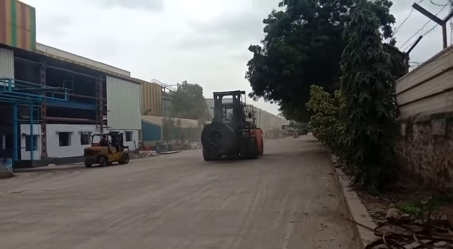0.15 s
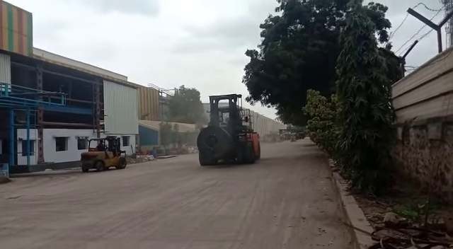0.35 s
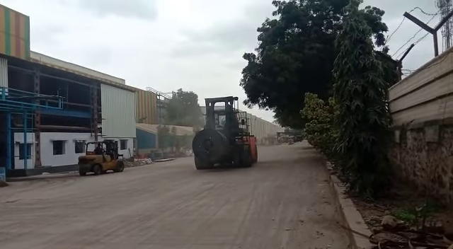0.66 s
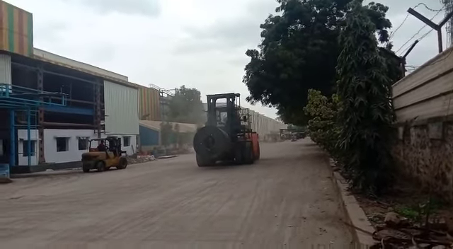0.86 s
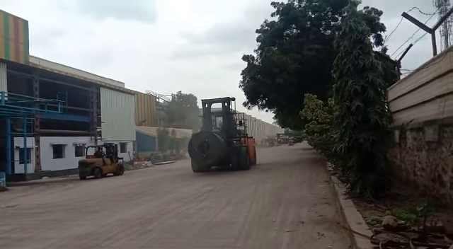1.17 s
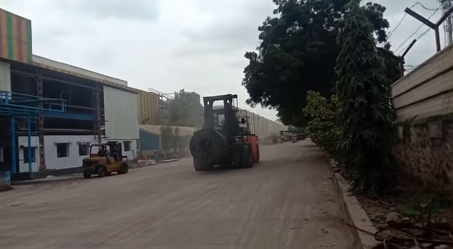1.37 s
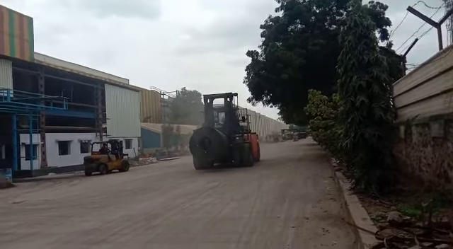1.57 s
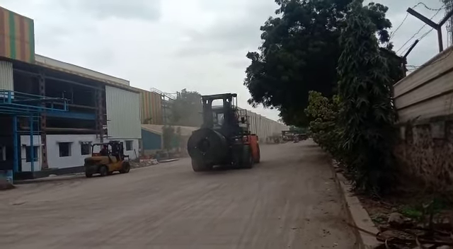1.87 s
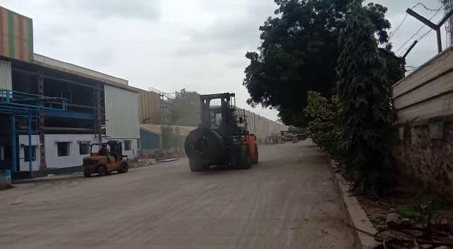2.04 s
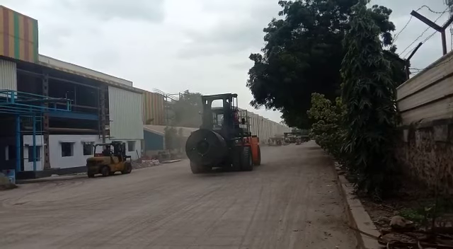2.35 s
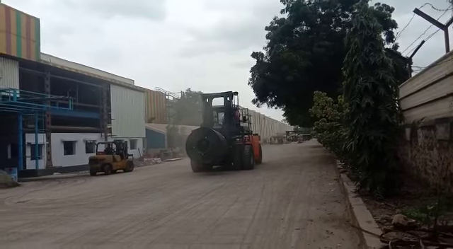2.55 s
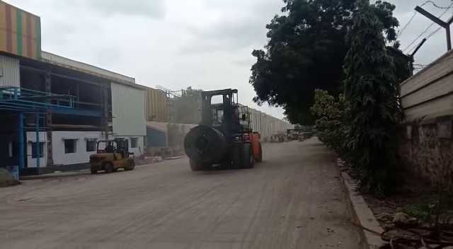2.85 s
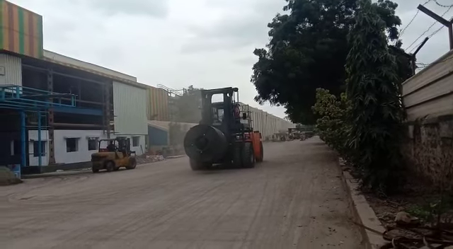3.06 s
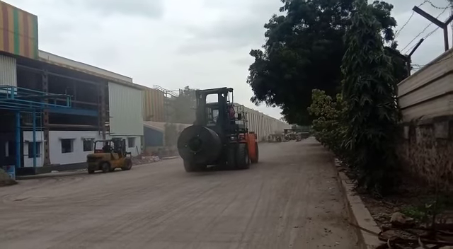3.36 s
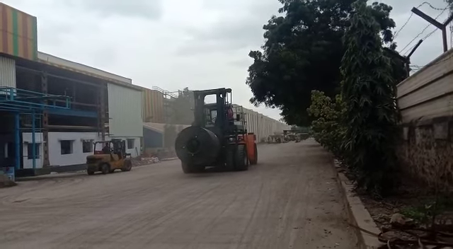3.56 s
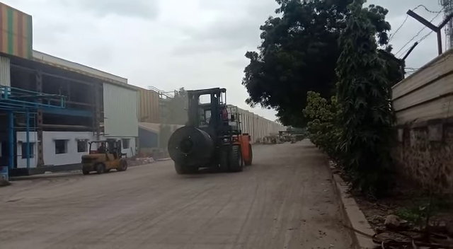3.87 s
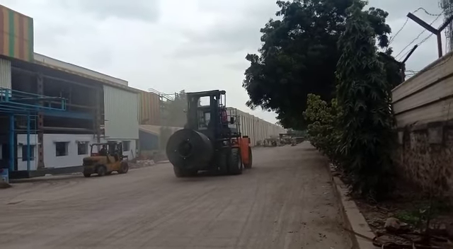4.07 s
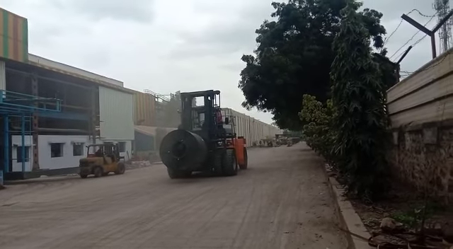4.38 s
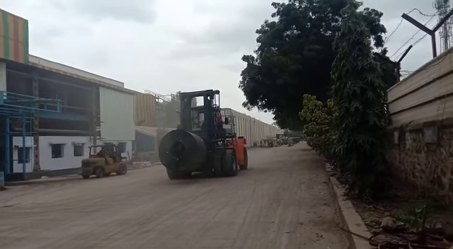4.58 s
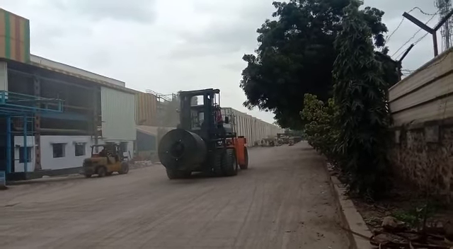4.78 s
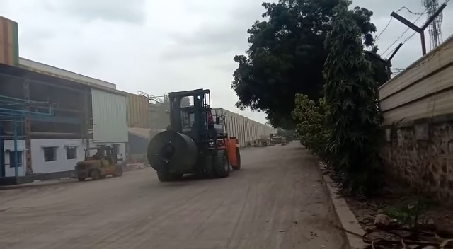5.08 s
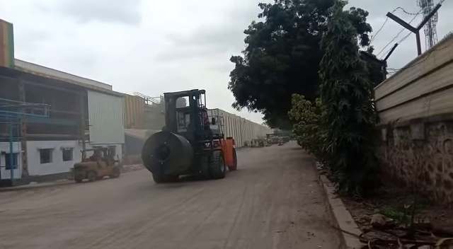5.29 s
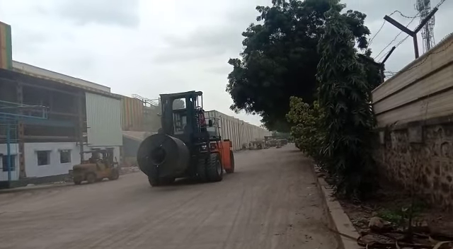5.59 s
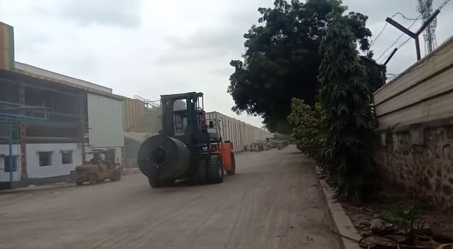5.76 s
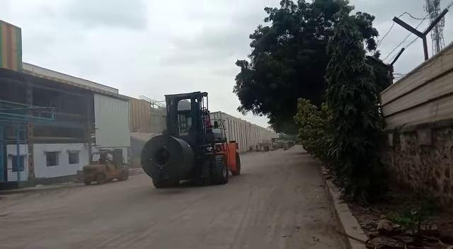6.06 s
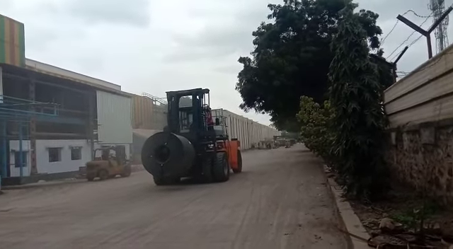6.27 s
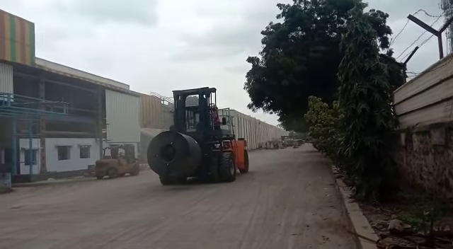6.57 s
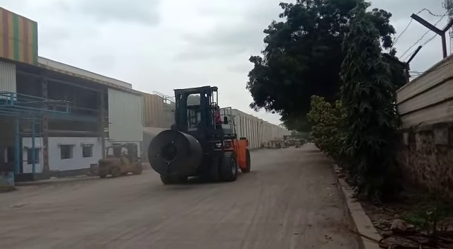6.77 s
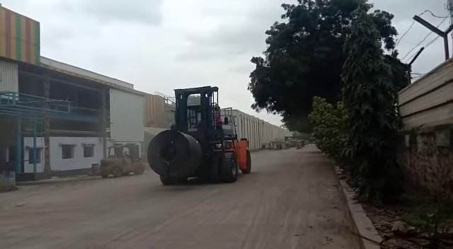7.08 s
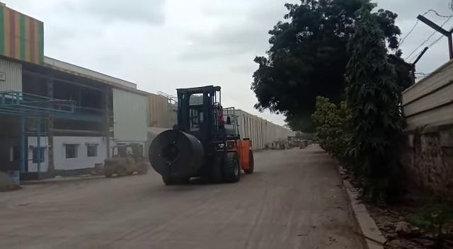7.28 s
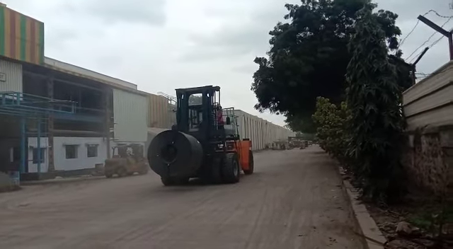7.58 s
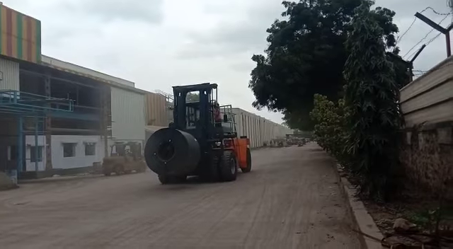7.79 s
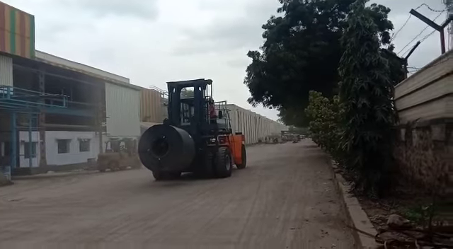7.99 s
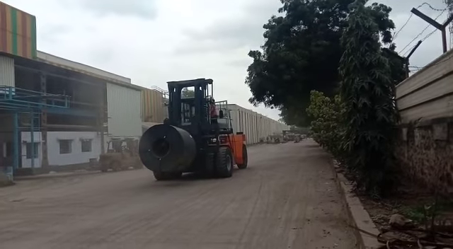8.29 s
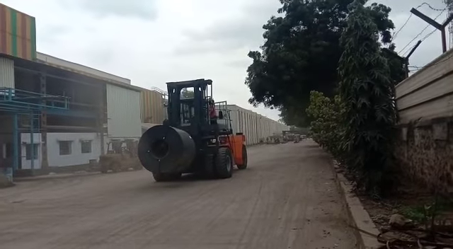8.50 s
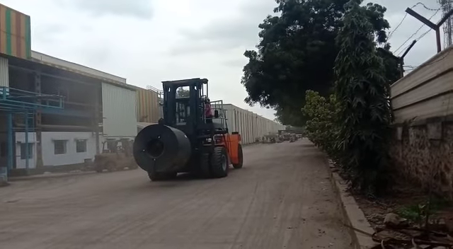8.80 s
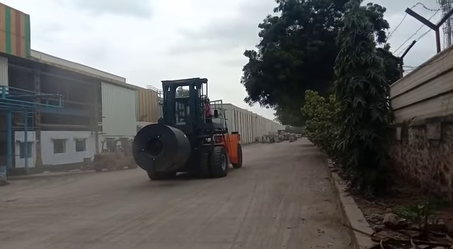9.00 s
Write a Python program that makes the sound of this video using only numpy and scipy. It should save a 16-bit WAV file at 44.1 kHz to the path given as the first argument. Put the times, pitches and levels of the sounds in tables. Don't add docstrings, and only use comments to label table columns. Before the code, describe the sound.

Outdoors in a dusty industrial yard, a heavy forklift carrying a large coil approaches. Its deep, smooth exhaust boom holds, rises slightly around two and a half seconds, then falls away into faint uneven coasting near five. A steady engine drone, broad airy roar and thin fan whine continue throughout. Mono microphone at a distance, dull on top.

```python
import sys
import numpy as np
from scipy import signal
from scipy.fft import rfft, irfft, next_fast_len
from scipy.io import wavfile
from scipy.ndimage import uniform_filter1d

SR = 44100
rng = np.random.default_rng(int(sys.argv[2]) if len(sys.argv) > 2 else 0)


def convert_level_to_amplitude(level_db):
    exponent = np.asarray(level_db, float) / 20
    return 10 ** exponent


def generate_wav(signal):
    frames = np.transpose(np.atleast_2d(signal))
    scaled = np.clip(frames, -1, 1) * 32767
    pcm = np.round(scaled).astype(np.int16)
    wavfile.write(sys.argv[1], SR, pcm)


N = 403074

# time_s, firing_hz, boom_db
FORKLIFT_EXHAUST = [(0.0, 98.6, -28), (0.15, 97, -17.5), (0.3, 92.6, -20.5), (1.5, 92.6, -17.5),
                    (2.26, 92, -19.5), (2.42, 100.6, -24.5), (2.52, 100.6, -19), (3.92, 100.5, -24.5),
                    (4.45, 100.1, -19.5), (4.97, 87.7, -31), (5.3, 80.1, -39), (6.1, 81.4, -33),
                    (6.45, 83, -38), (6.8, 85, -36), (7.3, 88, -33), (8.0, 82.4, -41), (8.3, 80, -34),
                    (9.14, 83, -35)]
# time_s, firing_order, level_db
THROTTLE_BARKS = [(4.85, 2, -28)]
# time_s, distance_m
FORKLIFT_DISTANCE = [(0, 28.6), (1.6, 32), (3.2, 24.5), (5, 21), (7.5, 22), (9.14, 20.7)]
# start_s, end_s, pitch_hz,
# level_db
SIDE_TONES = [(-.2, .3, 277, -33), (2.4, 3.2, 283, -37), (2.5, 3.5, 291, -40), (5.95, 9.14, 156, -38),
              (5.3, 8.9, 107, -40), (0, 9.14, 1626, -45), (0, 9.14, 1404, -44), (0, 9.14, 1256, -42),
              (3.4, 4.4, 272, -40), (0, 5, 212, -41), (0, 9.14, 590, -48), (0, 9.14, 318, -45)]
# time_s, peak_db
CHAIN_TICKS = [(0.9509, -45), (3.0436, -42), (5.7405, -44), (6.854, -44), (8.7347, -44), (9.0315, -45)]
# cycle_multiple, level_db
PLANT_ORDERS = [(11, -41.7), (14, -42.4), (16, -34.4), (18, -43.5), (22, -37.0), (28, -44.7), (31, -52.3),
                (32, -42.7), (36, -45.0), (40, -49.4), (41, -49.7), (48, -51.2), (56, -53.0), (62, -43.1),
                (66, -47.3), (68, -57.0), (74, -52.8), (76, -54.4), (78, -45.6), (79, -52.1), (85, -44.9),
                (86, -44.1), (93, -56.7), (128, -45.6), (138, -46.3), (145, -42.6), (149, -48.4),
                (150, -49.2), (227, -52.6), (246, -52.5)]
# start_s, end_s, cycle_rate_loss_hz
GOVERNOR_DROOPS = [(2.4, 4.0, .007), (7.0, 9.14, .0095)]
# time_s, half_length_s, dip_db
YARD_SHADES = [(3.4, .5, -11), (8.601, 0.8, -9)]
# frequency_hz, density_db_per_hz
RUMBLE_SPECTRUM = [(20, -36), (34, -36), (42, -12.5), (57, -24), (80, -2.5), (125, -3), (200, -2.5),
                   (230, -6), (250, -4), (320, -11), (355, -12), (520, -14.5), (1000, -18.5), (2200, -58)]
# frequency_hz, density_db_per_hz
BLAST_SPECTRUM = [(410, -20.5), (700, -15), (888, -9.5), (1010, -11), (1260, 0), (1830, -8.5), (2240, -6),
                  (2510, -6.5), (2950, -8.5), (3930, -17.5), (4800, -20), (6240, -22), (7250, -27.5),
                  (8970, -38.5), (13900, -53)]
# centre_hz, width_hz, gain_db
DUCT_RESONANCES = [(1220, 52, 4), (2140, 640, 1), (6130, 860, 5), (7200, 930, 8), (13700, 1400, -4)]
ROAR_CENTRES_HZ = [250, 1800, 5500, 12000]
NEAR_SHARES = [.05, .3, .5, .65]
# frequency_hz, density_db_per_hz
SHROUD_SPECTRUM = [(600, -120), (1100, -18), (1290, -3), (1370, 0.5), (1450, -6.5), (1560, -23),
                   (2000, -33), (4000, -120)]
# frequency_hz, density_db_per_hz
PORT_SPECTRUM = [(12000, -40), (13900, -16), (14300, -6), (14900, 0), (15600, -1)]

TIME_S = np.arange(N) / SR
PLANT_CYCLE_HZ = 10.6342
FAN_NEAR_SHARE = 0.93


def in_time(rows):
    time_s, *columns = np.transpose(rows)
    return [np.interp(TIME_S, time_s, column) for column in columns]


def rms_one(x):
    return x / np.sqrt(np.mean(x ** 2) + 1e-20)


def drift(rate_hz):
    hop, settle = 40, 2000
    pole = np.exp(-2 * np.pi * hop * rate_hz / SR)
    noise = rng.standard_normal(N // hop + settle + 2)
    slow = signal.lfilter([1], [1, -2 * pole, pole * pole], noise)[settle:]
    return np.interp(np.arange(N) / hop, np.arange(len(slow)), rms_one(slow))


def colour(x, spectrum, peaks=()):
    hz = np.maximum(np.arange(N // 2 + 1) * SR / N, 1)
    points = np.array(spectrum)
    shape_db = np.interp(np.log(hz), np.log(points[:, 0]), points[:, 1])
    for centre_hz, width_hz, bump_db in peaks:
        shape_db = shape_db + bump_db / (1 + (2 * (hz - centre_hz) / width_hz) ** 2)
    return rms_one(irfft(rfft(x) * convert_level_to_amplitude(shape_db), N))


def load(lag_s=0):
    lift_off_s, unload_s = 4.9, 0.36
    return np.clip((lift_off_s + lag_s - TIME_S) / unload_s + .5, 0, 1)


def near_db():
    metres, = in_time(FORKLIFT_DISTANCE)
    return 20 * np.log10(metres[0] / metres)


def forklift(uneven_db):
    coast_wander_hz, coast_uneven_db = 2.0, 2.0
    overtones_db, bark_s = [0, -26, -27], 0.19
    coasting = 1 - load()
    firing_hz, boom_db = in_time(FORKLIFT_EXHAUST)
    phase = 2 * np.pi * np.cumsum(firing_hz + coast_wander_hz * coasting * drift(8)) / SR
    spread_db = uneven_db + coast_uneven_db * coasting
    out = 0
    for k, order_db in enumerate(overtones_db):
        level_db = boom_db + order_db + spread_db * drift(6.2)
        out = out + convert_level_to_amplitude(level_db) * np.sin((k + 1) * phase + k)
    for bark_at_s, order, bark_db in THROTTLE_BARKS:
        swell = np.exp(-((TIME_S - bark_at_s) / bark_s) ** 2)
        out = out + convert_level_to_amplitude(bark_db) * swell * np.sin(round(order) * phase)
    return np.sqrt(2) * out


def side_tones():
    swell_s, waver_hz, sway_db = 0.14, 2.2, 3
    out = 0
    for start_s, end_s, pitch_hz, level_db in SIDE_TONES:
        swell = np.clip(np.minimum(TIME_S - start_s, end_s - TIME_S) / swell_s, 0, 1)
        phase = 2 * np.pi * np.cumsum(pitch_hz + waver_hz * drift(4)) / SR
        out = out + np.sqrt(2) * convert_level_to_amplitude(level_db + sway_db * drift(3)) * swell * np.sin(phase)
    return out


def plant_turns():
    turns = PLANT_CYCLE_HZ * TIME_S
    for start_s, end_s, loss_hz in GOVERNOR_DROOPS:
        turns = turns - loss_hz * np.clip(TIME_S - start_s, 0, end_s - start_s)
    return turns


def hum_db():
    level_db, depth, period_s, first_peak_s = -34.5, .55, 2.115, 1.28
    swing = np.cos(2 * np.pi * (TIME_S - first_peak_s) / period_s)
    return level_db + 20 * np.log10(1 + depth * swing)


def shade_db():
    return sum(dip_db * np.exp(-((TIME_S - s) / half_s) ** 2) for s, half_s, dip_db in YARD_SHADES)


def plant_drone(sway_db, trim_db):
    turns, out = plant_turns(), 0
    for order, level_db in PLANT_ORDERS:
        phase = 2 * np.pi * (order * turns + rng.random())
        if order == 16:
            level_db = hum_db()
        else:
            level_db = level_db + trim_db + sway_db * drift(.8)
        if order == 22:
            level_db = level_db + shade_db()
        out = out + np.sqrt(2) * convert_level_to_amplitude(level_db) * np.sin(phase)
    return out


def plant_excitation(repeat, chop):
    size = round(SR / PLANT_CYCLE_HZ)
    turns = plant_turns()
    clatter = rng.standard_normal(size)[np.round(turns * size).astype(int) % size]
    blades = 1 + chop * (np.sin(11 * np.pi * turns) + np.sin(22 * np.pi * turns))
    return np.sqrt(repeat) * clatter + np.sqrt(1 - repeat) * blades * rng.standard_normal(N)


def through_air(x, gust_db, patch_db, flutter_db):
    near = near_db() - near_db().mean()
    size = next_fast_len(N, True)
    octave = np.log2(np.maximum(np.arange(size // 2 + 1) * SR / size, 1))
    spectrum, gust, out = rfft(x, size), drift(12.0), 0
    gust = rms_one(gust - uniform_filter1d(gust, SR // 4))
    for centre in np.arange(4, 14.6, .5):
        mask = np.clip(1 - 2 * np.abs(octave - centre), 0, 1)
        region = np.interp(centre, np.log2(ROAR_CENTRES_HZ), np.arange(4))
        slow_db = np.interp(region, np.arange(4), NEAR_SHARES) * near
        scatter = np.clip((centre - 9.8) / 3.15, 0, 1)
        wobble_db = scatter * (gust_db * gust + flutter_db * drift(30)) + patch_db * drift(2.0)
        out = out + convert_level_to_amplitude(slow_db + wobble_db) * irfft(spectrum * mask, size)[:N]
    return out


def roar():
    rumble = convert_level_to_amplitude(-27) * colour(plant_excitation(repeat=.03, chop=0), RUMBLE_SPECTRUM)
    air = plant_excitation(repeat=0.11, chop=0.014)
    blast = convert_level_to_amplitude(-20.5) * colour(air, BLAST_SPECTRUM, DUCT_RESONANCES)
    return through_air(rumble + blast, gust_db=.65, patch_db=.3, flutter_db=.7)


def fan_whine():
    level_db = -33.5 + FAN_NEAR_SHARE * near_db() + 1.4 * drift(1.3)
    return convert_level_to_amplitude(level_db) * colour(rng.standard_normal(N), SHROUD_SPECTRUM)


def whistle():
    pitch_hz, width_hz = 1260.6, 35
    pole, x = np.exp(-np.pi * width_hz / SR), rng.standard_normal(N)
    resonance = [1, -2 * pole * np.cos(2 * np.pi * pitch_hz / SR), pole * pole]
    for _ in range(2):
        x = signal.lfilter([1, 0, -1], resonance, x)
    level_db = -33 + FAN_NEAR_SHARE * near_db() + 1.1 * drift(0.4)
    return convert_level_to_amplitude(level_db) * rms_one(x)


def ticks():
    decay_s, trim_db, highpass_hz = .004, -4, 7500
    clicks = np.zeros(N) + 1e-18
    for tick_s, peak_db in CHAIN_TICKS:
        clicks[int(tick_s * SR)] = convert_level_to_amplitude(peak_db + trim_db)
    envelope = signal.lfilter([1], [1, -np.exp(-1 / (decay_s * SR))], clicks)
    burst = envelope * rng.standard_normal(N)
    return signal.sosfilt(signal.butter(2, highpass_hz, "high", fs=SR, output="sos"), burst)


def port_hiss(flicker_db):
    flicker = flicker_db * (drift(14) + .7 * drift(40))
    level_db = -57.5 + .3 * near_db() + 3 * load(lag_s=.5) + flicker
    return convert_level_to_amplitude(level_db) * colour(rng.standard_normal(N), PORT_SPECTRUM)


def scene():
    machine = forklift(uneven_db=.75) + side_tones() + fan_whine() + whistle() + ticks()
    drone = plant_drone(sway_db=.7, trim_db=1.6)
    return (machine + drone + roar() + port_hiss(flicker_db=1.5))[None]


def band_limit(x):
    return signal.sosfilt(signal.butter(12, 16870, fs=SR, output="sos"), x)


def record(dry):
    rounded = 0.8 * np.tanh(dry / 0.78)
    steep = signal.ellip(14, .3, 70, 15430, fs=SR, output="sos")
    fade = np.clip(np.arange(N)[::-1] / 200, 0, 1)
    return band_limit(fade * signal.sosfilt(steep, rounded))


dry = scene()
out = record(dry)
generate_wav(out)
```